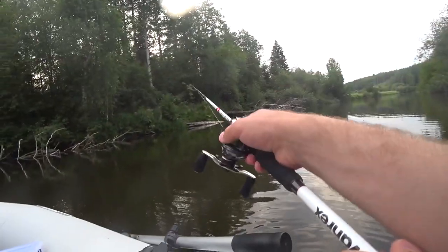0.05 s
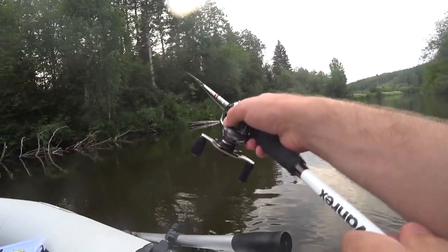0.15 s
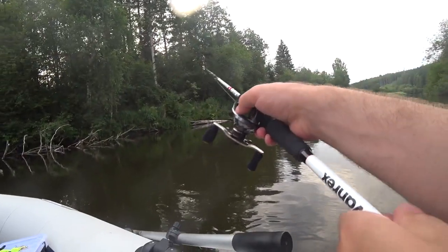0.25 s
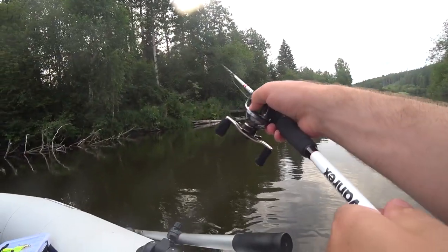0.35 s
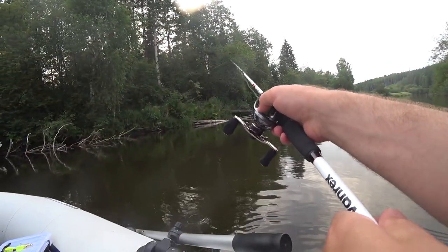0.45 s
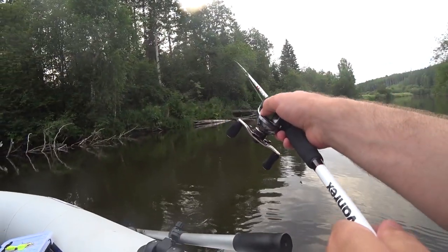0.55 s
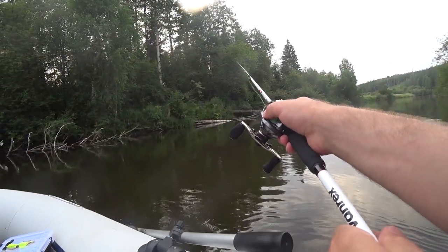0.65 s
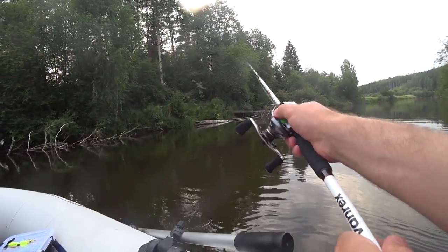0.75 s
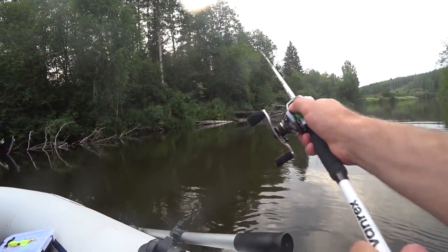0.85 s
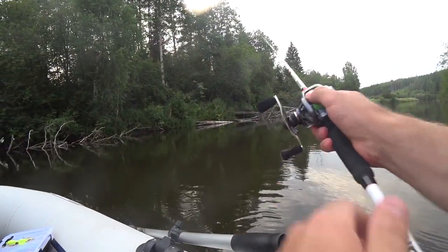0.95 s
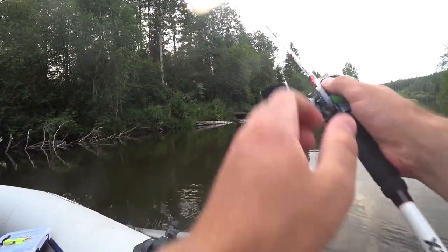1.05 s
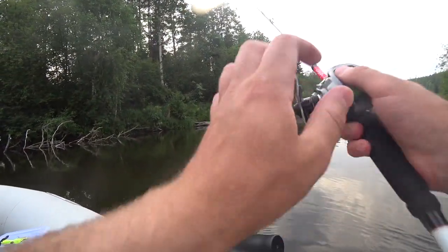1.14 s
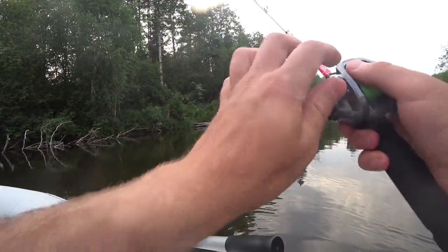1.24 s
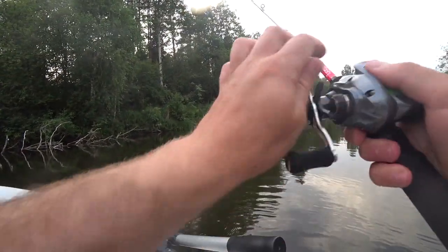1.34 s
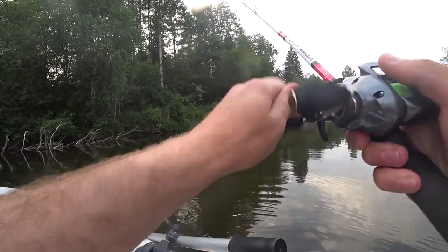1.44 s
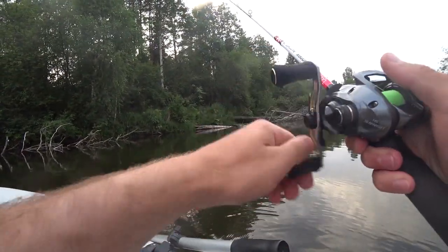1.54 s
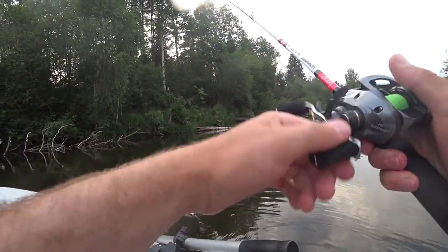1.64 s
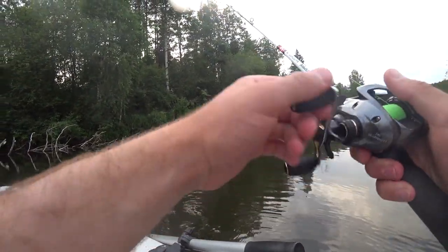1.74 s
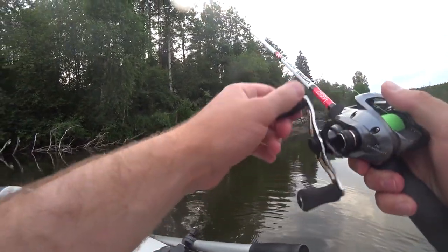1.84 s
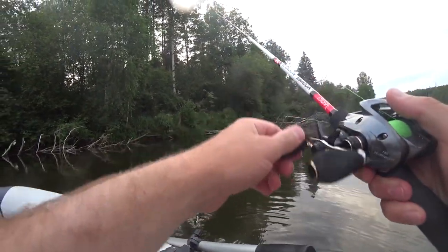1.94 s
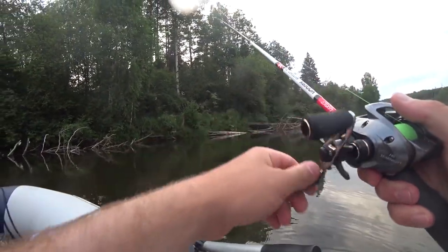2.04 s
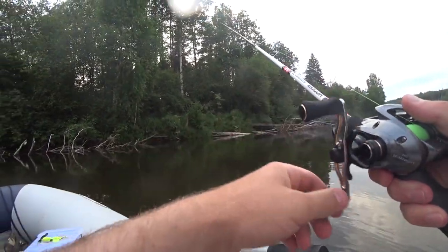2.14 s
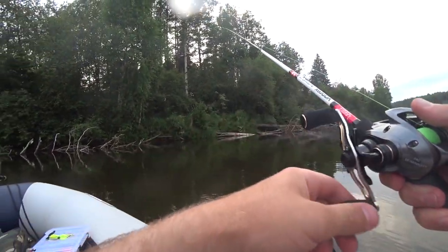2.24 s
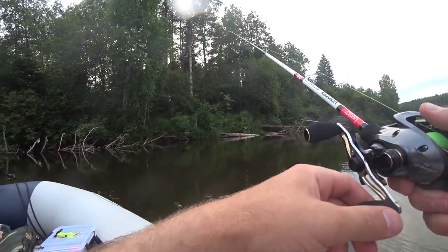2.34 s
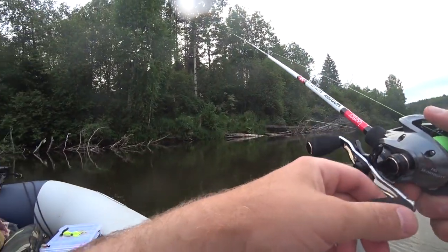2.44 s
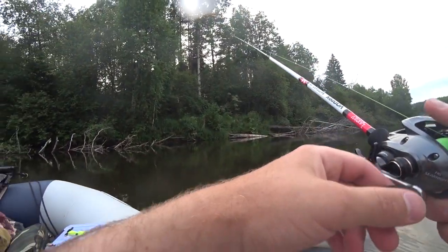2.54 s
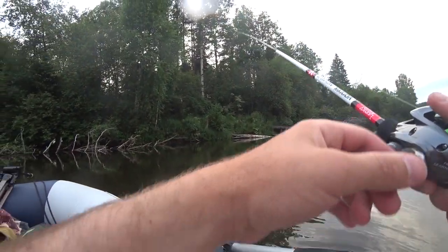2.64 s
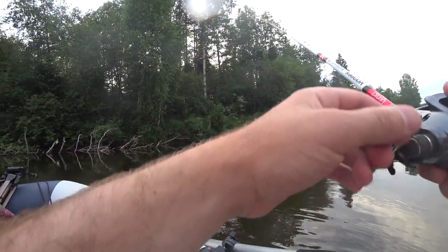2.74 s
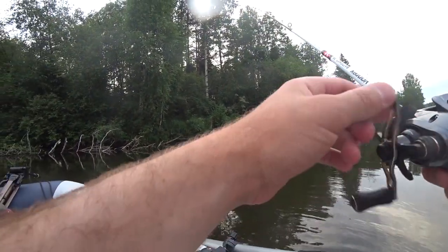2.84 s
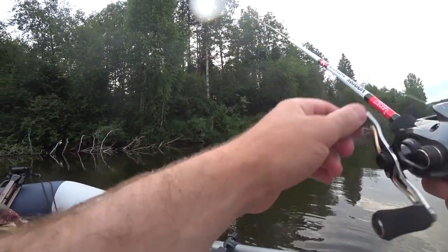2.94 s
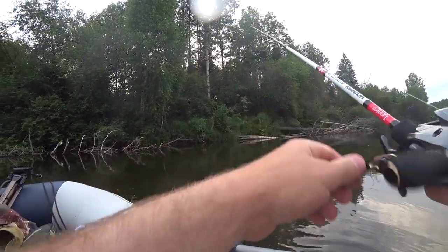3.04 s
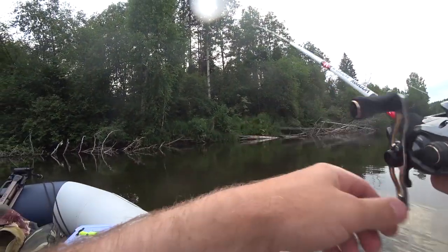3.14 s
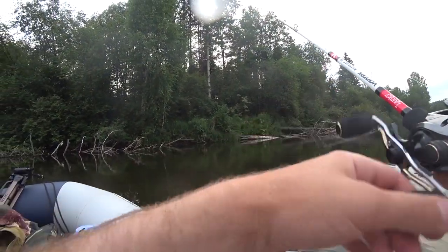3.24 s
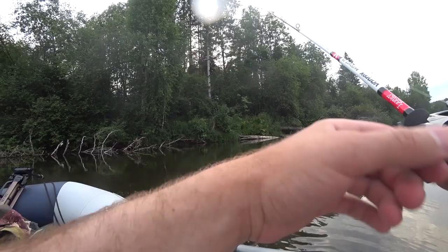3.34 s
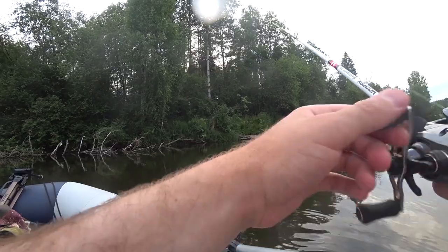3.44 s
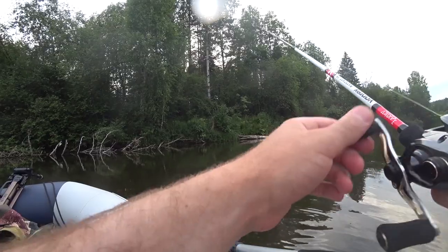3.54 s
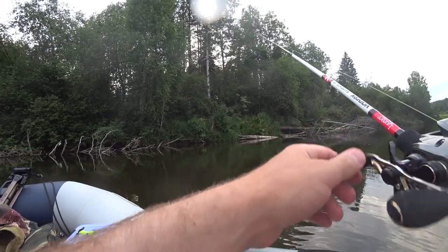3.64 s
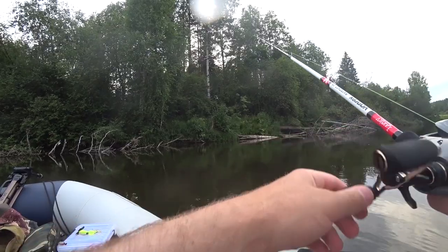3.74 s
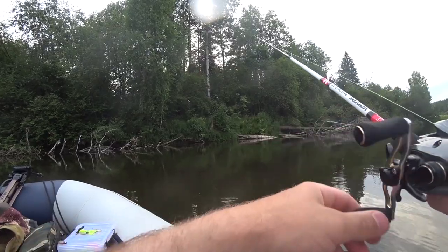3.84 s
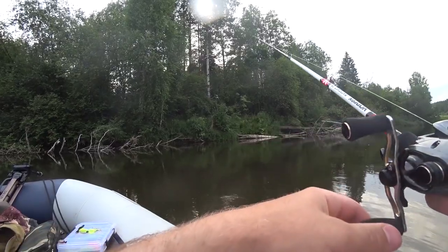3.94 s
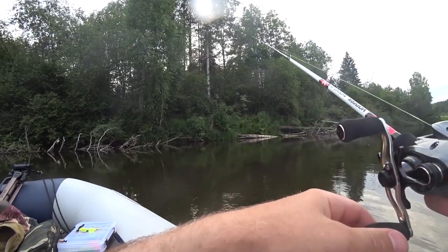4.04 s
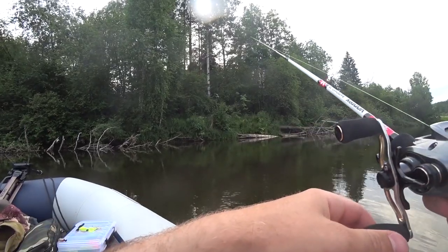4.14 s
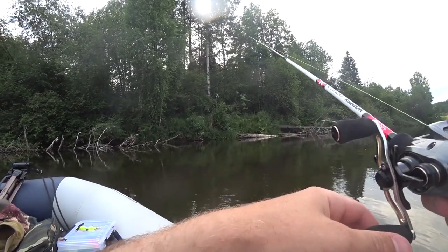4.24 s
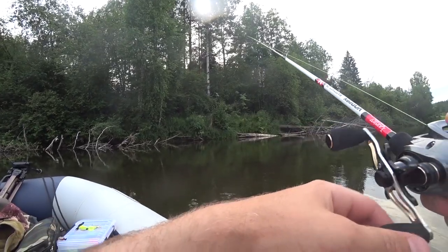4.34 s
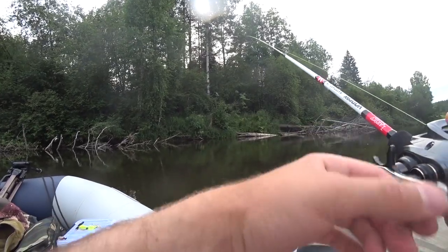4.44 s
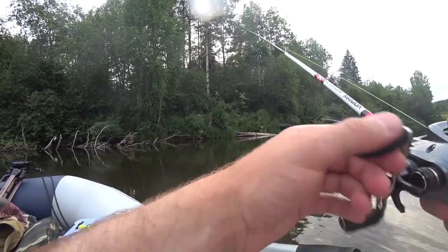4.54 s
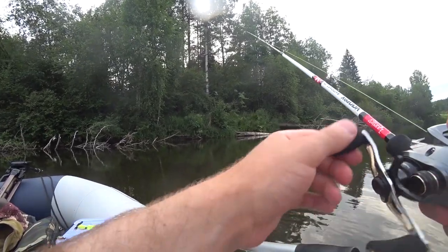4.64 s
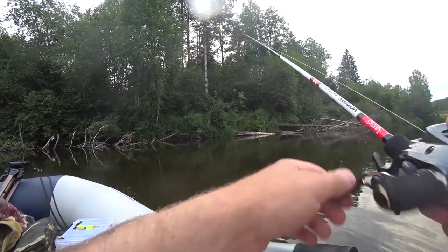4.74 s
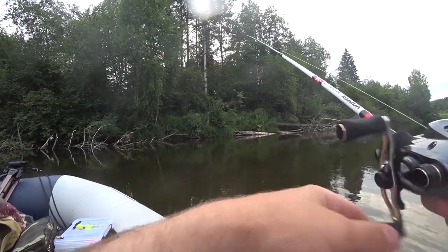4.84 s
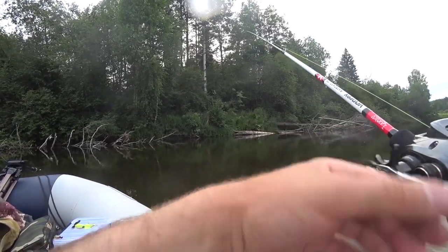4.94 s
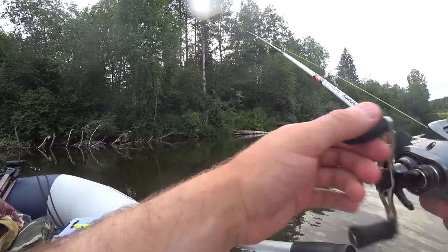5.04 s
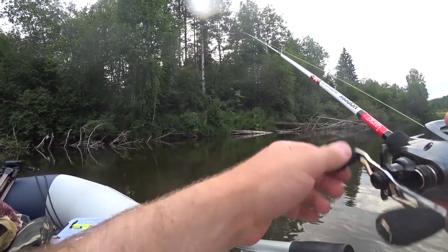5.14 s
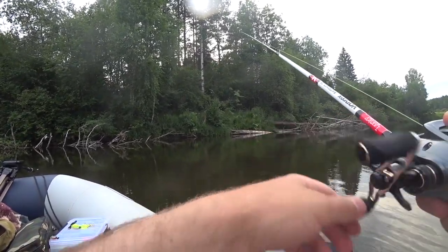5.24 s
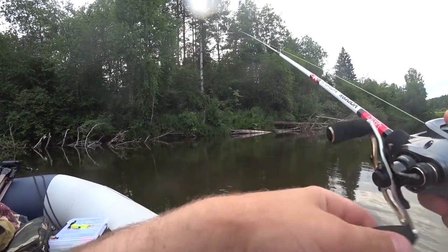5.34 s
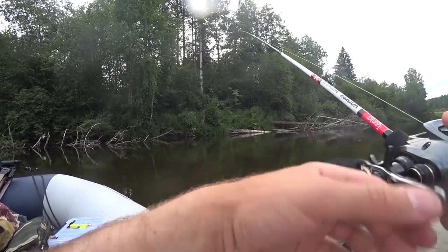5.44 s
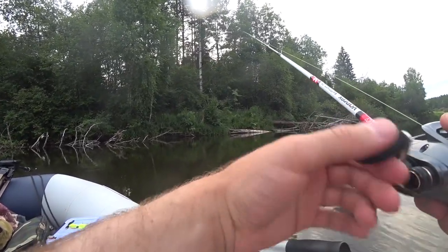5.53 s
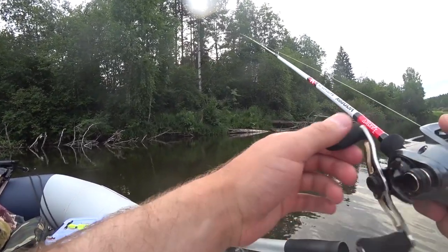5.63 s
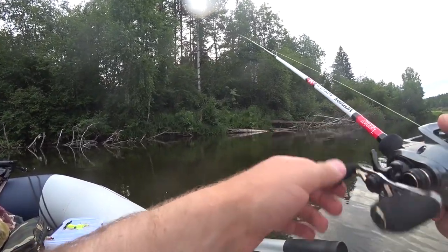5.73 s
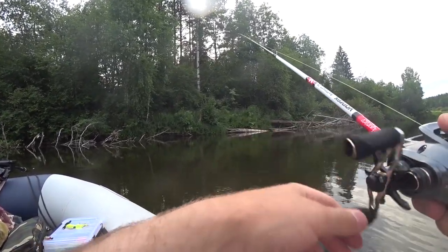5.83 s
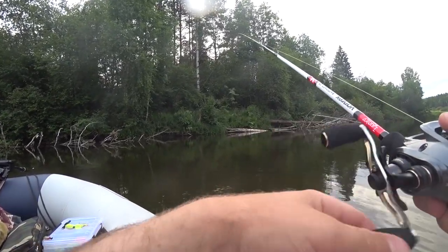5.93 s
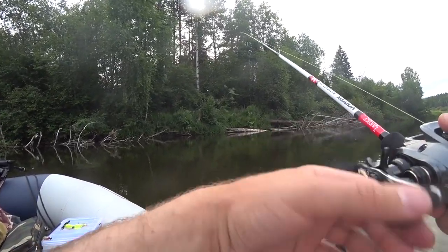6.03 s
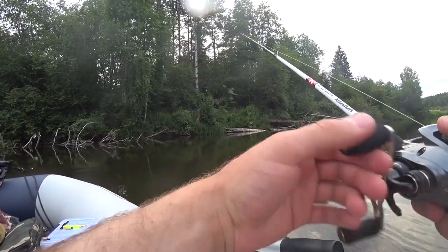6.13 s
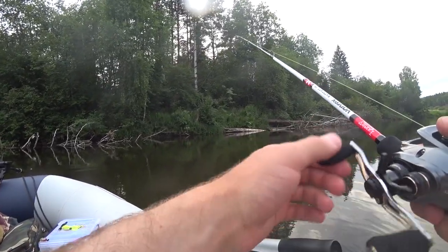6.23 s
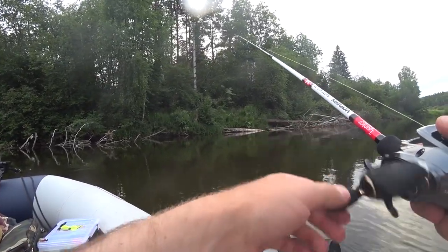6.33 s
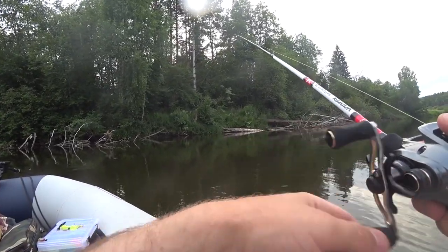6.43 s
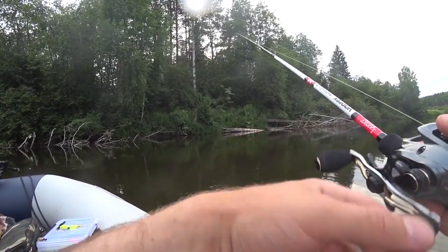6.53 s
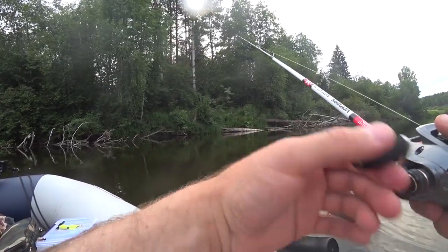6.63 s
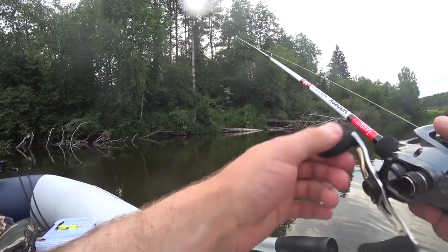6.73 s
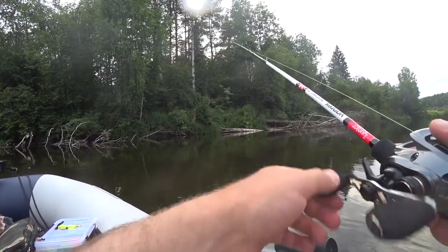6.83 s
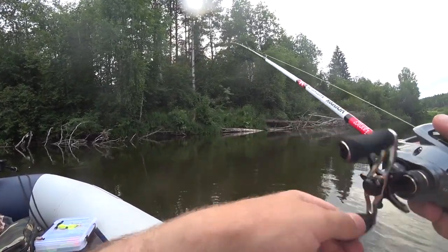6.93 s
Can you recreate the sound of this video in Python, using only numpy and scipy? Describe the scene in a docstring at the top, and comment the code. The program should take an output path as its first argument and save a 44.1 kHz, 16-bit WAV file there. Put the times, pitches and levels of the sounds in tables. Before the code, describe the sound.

Close-up casting reel whine slows quickly and cuts off, a sharp metallic snap follows, then gentle cranking rustles under chirping songbirds outdoors.

```python
"""A fishing cast from a boat on a quiet forest river, with open air and a thin whine throughout.
First the spool hums at multiples of its slowing speed, line hisses off as noise, loose coils slap, a thumb stops it.
Songbirds, made of gliding tones with an echo from the trees, join in and a low rumble of filtered noise fades in.
The clutch snaps in with clicks and knocks, then filtered noise winds the line softly back while the hand bumps the grip.
Later come an even trill of falling chips and last a see-saw song, high and low in turn."""
import sys
import numpy as np
from scipy import signal
from scipy.fft import rfft, irfft, next_fast_len
from scipy.io import wavfile

SR = 44100
rng = np.random.default_rng(int(sys.argv[2]) if len(sys.argv) > 2 else 0)


def store_wav(level_fs):
    """Save 16-bit WAV to argv[1]."""
    pcm = np.round(np.clip(np.atleast_2d(level_fs), -1, 1) * 32767)
    wavfile.write(sys.argv[1], SR, pcm.T.astype(np.int16))


N = 307818
T = np.arange(N) / SR  # time of every sample, in seconds

# Colour of the open air. Each row: frequency in Hz, level in dB.
AIR = [(15, -47), (25, -4), (104, -5.5), (1900, -26.5), (2450, -27.5), (3970, -25), (4630, -24.5),
       (4990, -28.5), (6780, -29.5), (10200, -32), (11000, -38), (14300, -92), (22000, -120)]
AIR_DB = -45.0
# The low rumble fades in and holds; its extra swell has rows: middle in seconds, length in seconds, level in dB.
RUMBLE_HZ, RUMBLE_WIDTH_HZ = 99.8, 19
RUMBLE_FROM_S, RUMBLE_FADE_S, RUMBLE_DB = 1.14, 1.1, -50.5
RUMBLE_SWELL = [(5.7, 1.5, -55)]
WHINE_HZ, WHINE_WANDER_HZ, WHINE_DB = 9945, 42, -64.5

# How fast the spool spins. Each row: time in seconds, turns per second (Hz).
SPEED = [(0.035, 314.1), (0.487, 179.7), (0.7, 111.1)]
# Strength of the spool's partials, before its body colours them; only multiples from 2 up are used.
# Each row: multiple of the spool speed, level in dB.
SPOOL_ORDERS = [(1, 0), (2, -8.5), (3, -2.5), (4, -7), (5, -7.5), (6, -9), (7, -8), (8, -12), (9, -11.5),
                (10, -14.5), (11, -9.5), (12, -9)]
# How the spool's body colours its partials. Each row: frequency in Hz, level in dB.
SPOOL_BODY = [(650, -19.5), (900, -3), (1500, 1.5), (2000, -1), (2450, 8.5), (2900, -2.5), (3500, 1.5),
              (4500, -6), (5400, -10), (6300, 0), (7200, -4), (11000, -16.5)]
# Colour of the line hissing off the spool. Each row: frequency in Hz, level in dB.
LINE_HISS = [(200, -7), (650, -12), (1300, -0.5), (2500, -3.5), (3200, -4), (4700, 0), (5500, -5.5),
             (7000, -5), (9000, 0.5), (11000, 0.5)]
# Levels at full speed; they fall as a power of the speed until the thumb stops the spool.
WHIR_DB, WHIR_POWER = -26.5, 3
HISS_DB, HISS_POWER = -25.5, 1.43
LINE_FLICK = 0.39  # once-a-turn flicks of the line, relative to its hiss
THUMB_S, THUMB_STOP_S = 0.77, 0.014
# The line runs off faster for a moment. Each row: middle in seconds, length in seconds, level in dB.
SURGES = [(.518, 0.045, -36), (.755, 0.033, -43)]

# Colour of a loose coil slapping the line guide. Each row: frequency in Hz, level in dB.
SLAP_BODY = [(300, -13.5), (2000, -27), (3300, 0.5), (4500, 2.5), (5400, -6), (6300, 1), (7600, -0.5),
             (8800, 5), (9600, 0.5), (10800, 2)]
SLAP_FROM_S, SLAP_TO_S, SLAP_ATTACK_S, SLAP_RELEASE_S = 0.261, 0.403, .012, 0.026
SLAP_PEAK_S, SLAP_DB, SLAP_SLOPE_DB_PER_S = 0.34, -20.5, 90
FRAME_HZ, FRAME_WIDTH_HZ = 4520, 950

# Clutch, pawl and spool clicks, before the tick boost and filters.
# Each row: start in seconds, metal tick in dB, housing knock in dB, knock pitch in Hz.
CLICKS = [(.3825, -13, -30, 3500), (.3853, -21, -19, 3600), (.552, -24, -21, 2500), (.789, -36, -27, 2500),
          (.816, -50, -33, 2250), (1.3590, -11, -12, 2900), (1.3711, -11, -30, 2500),
          (1.3731, -3, -20, 2300), (1.3743, -9, 1, 2180), (1.3788, -26, -16, 2400),
          (1.3826, -10, -24, 2300), (1.3834, -6, -14, 2400), (1.3892, -19, -22, 2200),
          (1.4057, -24, -45, 2100), (1.606, -28, -44, 2300), (4.932, -50, -32, 1100)]
# Colour of a metal tick. Each row: frequency in Hz, level in dB.
TICK_BODY = [(450, -24), (800, -6), (1500, -5), (3100, -2), (3700, -8), (4600, -2), (5400, -9), (6500, -3),
             (7300, -6), (8600, 1), (11000, -2)]
TICK_BOOST_DB, TICK_T60_S, KNOCK_RISE_S = 9.5, .005, .00045  # T60: time to die away by 60 dB
# After the clutch snaps in, the handle rocks in its play, weaker each time.
ROCK_S, ROCK_GAP_S = 1.394, .0168
ROCK_TICK_DB, ROCK_KNOCK_DB, ROCK_LOSS_DB, ROCK_HZ = -28, -15.5, 3.5, 2050
# Every click leaves a short dull shiver in the rod and housing, relative to its tick before the boost.
SHIVER_DB, SHIVER_T60_S, SHIVER_TOP_HZ = -17, 0.074, 4200
TOP_HZ = 11050  # treble limit

# Shapes of the birds' syllables: pitch from start to end, as a ratio to the note's pitch.
ARCH, SCOOP, LEVEL = (.94, 1, .85), (1.05, 1, 1.17), (.99, 1, 1.025)
UPSLUR, DOWNSLUR = (.94, 1, 1.1), (1.045, 1, .975)
WHIP = (.82, 1, .83, .76)
# Rising notes. Each row: start in seconds, length in seconds, pitch in Hz, level in dB.
UPSLURS = [(.84, 0.072, 5160, -51.5), (2.47, 0.094, 3270, -49.5), (3.505, .06, 4850, -50.5),
           (4.14, 0.044, 5180, -51.5)]
# Level whistles. Each row: start in seconds, length in seconds, pitch in Hz, level in dB.
WHISTLES = [(.9, .07, 4850, -52), (.93, .12, 3980, -53), (1.445, .17, 3983, -45),
            (1.722, 0.049, 5550, -46.5), (1.76, 0.092, 4545, -44.5), (2.1, 0.089, 3710, -48.5),
            (2.22, .065, 5800, -51.5), (2.34, 0.114, 3930, -50.5), (2.83, .04, 3910, -49),
            (3.17, .09, 3630, -53.5), (3.465, 0.11, 3670, -56.5), (4.22, 0.14, 3896, -51),
            (6.42, .08, 5800, -60)]
# Arched notes. Each row: start in seconds, length in seconds, pitch in Hz, level in dB.
ARCHES = [(1.03, .135, 4630, -46.5), (1.245, 0.12, 4600, -41), (1.655, 0.049, 3850, -42.5),
          (1.848, .055, 4080, -44), (2.203, 0.038, 3500, -43)]
# Quick notes that flick up and whip down. Each row: start in seconds, length in seconds, pitch in Hz, level in dB.
WHIPS = [(1.503, .082, 4780, -42.5), (2.027, .068, 4220, -43), (2.288, 0.069, 4750, -48.5)]
# Falling notes. Each row: start in seconds, length in seconds, pitch in Hz, level in dB.
DOWNSLURS = [(2.64, 0.073, 4690, -55), (2.98, .085, 4680, -49.5), (3.3, .07, 4170, -58),
             (3.4, .05, 4580, -56), (6.037, 0.051, 4220, -40.5), (6.875, .055, 4420, -50.5)]
# Scooped notes. Each row: start in seconds, length in seconds, pitch in Hz, level in dB.
SCOOPS = [(2.66, 0.091, 3130, -47.5), (2.84, .11, 3130, -48), (3.045, .05, 2220, -53.5)]
# Thin, buzzy calls of another bird. Each row: start in seconds, length in seconds, pitch in Hz, level in dB.
BUZZES = [(2.8, .09, 6900, -61), (4.58, 0.076, 6850, -49.5), (4.75, .16, 6730, -56.5),
          (5.07, .11, 6700, -57), (5.34, .09, 7050, -55.5)]
# An even trill of steep falling chips with a high pip between them.
# Each first note: start in seconds, length in seconds, pitch in Hz, level in dB.
CHIP, CHIP_SHAPE = (4.772, .07, 3870, -53.5), (1.19, 1, .8)
PIP = (4.872, .035, 5250, -53)
TRILL_GAP_S = .202
# A see-saw song, high and low in turn; its first notes have the same columns.
SEE, SAW = (5.885, .08, 4780, -49.5), (6.055, .065, 4000, -45.5)
SEESAW_GAP_S = .323
SONG_FLICKER_DB = 3
# Farther birds chirp at random, heard only through the trees; the level is before the echo.
FAR_DB, FAR_HZ, FAR_SPREAD, FAR_LENGTH_S = -57.5, 4200, 0.21, .07
FOREST_T60_S, FOREST_DB = .85, -4.5

# Wet line drawn through the guides. Each row: middle in seconds, length in seconds, level in dB.
SWISHES = [(.93, .06, -49.5), (1.68, 0.25, -52.5), (2.25, 0.13, -52), (2.39, 0.24, -52), (2.88, .1, -59),
           (4.43, .05, -54), (4.53, 0.083, -49), (4.64, 0.14, -51.5), (4.85, .3, -60), (6.85, .6, -59)]
# Spells of cranking. Each row: start in seconds, end in seconds, gear rustle in dB.
CRANKING = [(1.424, 3.4, -55.5), (4.375, 6.98, -54)]
CRANK_START_S, CRANK_STOP_S = 0.064, .6
# Colour of the gears. Each row: frequency in Hz, level in dB.
GEAR_BODY = [(300, -21.5), (700, -18.5), (1200, 5), (2300, 4), (3000, 3), (4500, 1), (7000, -3), (9000, -4),
             (11000, -28)]
# The hub rubbing as the handle comes round. Each row: middle in seconds, length in seconds, level in dB.
RUBS = [(1.687, 0.2, -51.5), (2.229, 0.12, -48.5), (2.84, 0.13, -56), (3.26, 0.15, -51.5),
        (4.55, 0.13, -56), (4.953, 0.21, -51.5)]
# The hand shifting on the grip. Each row: middle in seconds, length in seconds, level in dB.
SHIFTS = [(1.452, 0.027, -36.5), (1.53, 0.047, -47), (1.68, .17, -44.5), (2.04, 0.33, -49),
          (2.23, 0.14, -49.5)]
# Dull colour of the hand on the hollow grip. Each row: frequency in Hz, level in dB.
HAND_BODY = [(90, -22), (130, -3), (190, 1), (260, -3), (390, 1), (540, -12), (1200, -24), (3000, -45)]
GRIP_DB = -2  # dull noise of the cranking hand, relative to the gears
# Soft bumps of the palm on the grip. Each row: start in seconds, level in dB, pitch in Hz.
BUMPS = [(1.445, -36, 195), (1.52, -28.5, 182), (1.56, -34, 130), (1.665, -37, 201), (1.883, -34.5, 182),
         (2.069, -40, 180)]


def undb(db):
    """Turn decibels into a gain."""
    return 10 ** (np.asarray(db) / 20)


def unit(x):
    """Scale to an average (rms) strength of 1."""
    return x / np.sqrt(np.mean(x ** 2))


def curve(rows):
    """Draw straight lines between (seconds, value) rows, at every sample."""
    return np.interp(T, *np.transpose(rows))


def colour(x, points):
    """Filter to the given (Hz, dB) spectrum, without sounding before its input."""
    hz, db = np.transpose(points)
    size = next_fast_len(N + SR // 10) // 2 * 2
    freq = np.maximum(np.fft.rfftfreq(size, 1 / SR), 1)
    gain = undb(np.interp(np.log(freq), np.log(hz), db))
    # folding the cepstrum forward gives the minimum-phase filter
    cepstrum = irfft(np.log(gain))
    cepstrum[1:size // 2] *= 2
    cepstrum[size // 2 + 1:] = 0
    response = np.exp(rfft(cepstrum))
    return irfft(rfft(x, size) * response)[..., :N]


def resonate(x, hz, width_hz):
    """Ring one resonance of the given pitch and width."""
    return signal.lfilter(*signal.iirpeak(hz, hz / width_hz, fs=SR), x)


def band(hz, width_hz):
    """Noise in one resonance, rms 1."""
    return unit(resonate(rng.standard_normal(N), hz, width_hz))


def butter(x, order, hz, kind="low"):
    """Keep the lows, or a band, with a smooth filter."""
    return signal.sosfilt(signal.butter(order, hz, kind, fs=SR, output="sos"), x)


def walk(rate):
    """Slow chance with a spread near 1, given new random points per second."""
    return np.interp(T * rate, np.arange(N // 10), rng.standard_normal(N // 10))


def place(x, left_db, spread):
    """Two channels: a level difference, and brief reflections from hands and boat that differ between them."""
    scatter = rng.standard_normal(SR // 200)
    side = spread * signal.fftconvolve(x, scatter / np.linalg.norm(scatter))[:N]
    return np.array([(x + side) * undb(left_db / 2), (x - side) * undb(-left_db / 2)])


def add(track, s, sound):
    """Mix a short sound in at time s."""
    start = max(int(s * SR), 0)
    track[start:start + len(sound)] += sound[:max(N - start, 0)]


def swells(rows):
    """Smooth rises and falls, each with its own time, length and level."""
    return sum(undb(db) * np.exp(-(2 * (T - s) / length) ** 2) for s, length, db in rows)


def gate(start, end, attack, release):
    """Rise from the start, hold until the end, then fall."""
    return np.clip((T - start) / attack, 0, 1) * np.clip(1 - (T - end) / release, 0, 1)


def background():
    """Open air over the river and a low rumble are filtered noise; the thin whine is a slightly wandering tone."""
    mid, side = colour(rng.standard_normal((2, N)), AIR)
    # the two channels differ by more at some pitches than at others
    side = colour(side, [(50, -20.0), (125, -13.5), (250, -5.5), (600, 1.5), (2000, 3.0), (5000, -6.5),
                         (10000, -0.5)])
    air = unit(np.array([mid + side, mid - side])) * undb(AIR_DB + 0.13 * walk(2.88))
    rumble = butter(band(RUMBLE_HZ, RUMBLE_WIDTH_HZ), 2, 220)
    fade = np.clip((T - RUMBLE_FROM_S) / RUMBLE_FADE_S, 0, 1)
    strength = undb(RUMBLE_DB) * fade + swells(RUMBLE_SWELL)
    whine_hz = WHINE_HZ + WHINE_WANDER_HZ * walk(300)
    whine = unit(np.sin(2 * np.pi * np.cumsum(whine_hz) / SR))
    return air + rumble * strength + whine * undb(WHINE_DB)


def spool(count=36):
    """The unbalanced spool hums and shakes the frame at multiples of its speed; the line hisses off it."""
    (s0, hz0), (s1, hz1) = SPEED[0], SPEED[-1]
    slowing = (hz1 - hz0) / (s1 - s0)
    hz = curve(SPEED) + np.clip(T - s1, 0, .1) * slowing  # the brake keeps slowing it
    speed = hz / hz0
    running = np.clip(1 - (T - THUMB_S) / THUMB_STOP_S, 0, 1)
    turns = np.cumsum(hz * (1 + 0.0037 * walk(150))) / SR
    hum = np.sin(2 * np.pi * turns) * speed
    # each partial swells and flickers as the line wanders across the spool
    bearings = np.zeros(N)
    for k in range(2, count):
        db = dict(SPOOL_ORDERS).get(k, -10) + (2.5 * walk(22) + 1.8 * walk(170))[:SR]
        add(bearings, 0, undb(db) * np.sin(2 * np.pi * (k * turns[:SR] + rng.random())))
    whir = undb(-4.0) * hum + undb(-0.5) * colour(bearings, SPOOL_BODY)
    whir = whir * undb(WHIR_DB) * speed ** WHIR_POWER
    flutter = 1 + .4 * np.cos(2 * np.pi * turns)
    flicks = np.diff(np.floor(turns), prepend=0) * np.sqrt(SR / hz)
    rush = (rng.standard_normal(N) * flutter + LINE_FLICK * flicks) * undb(0.9 * walk(820))
    hiss = unit(colour(rush, LINE_HISS)) * (undb(HISS_DB) * speed ** HISS_POWER + swells(SURGES))
    rasp = unit(undb(1.1 * walk(400)))  # the line drags unevenly from turn to turn
    return place((whir * rasp + hiss) * running + slap(turns), left_db=-0.8, spread=0.21)


def slap(turns):
    """A loose coil brushes the line guide twice a turn and rings the frame once a turn."""
    strikes = np.diff(np.floor(turns), prepend=0)
    brushes = strikes + 0.7 * np.diff(np.floor(turns + .5), prepend=0)
    contact = signal.lfilter([1], [1, -np.exp(-1 / (.0013 * SR))], brushes)  # each touch fades in 1.3 ms
    scrape = colour(1.15 * unit(brushes) + unit(rng.standard_normal(N) * contact), SLAP_BODY)
    frame = resonate(resonate(strikes, FRAME_HZ, FRAME_WIDTH_HZ), FRAME_HZ, FRAME_WIDTH_HZ)
    force = undb(SLAP_DB - SLAP_SLOPE_DB_PER_S * np.abs(T - SLAP_PEAK_S) + walk(197))
    loose = gate(SLAP_FROM_S, SLAP_TO_S, SLAP_ATTACK_S, SLAP_RELEASE_S)
    return (undb(-1.0) * unit(scrape) + undb(-15.0) * unit(frame)) * force * loose


def clicks():
    """Steel parts snap together; each contact also knocks the damped housing for a few cycles."""
    ticks, knocks, shivers = np.zeros(N), np.zeros(N), np.zeros(N)
    t = T[:SR // 20]
    rocking = [(ROCK_S + k * ROCK_GAP_S, ROCK_TICK_DB - 2 * k * ROCK_LOSS_DB,
                ROCK_KNOCK_DB - k * ROCK_LOSS_DB, ROCK_HZ) for k in range(3)]
    # a sharp snap with a weaker, longer tail
    snap = undb(-60 * t / TICK_T60_S) + undb(-27 - 60 * t / .04)
    swell = (t / KNOCK_RISE_S) ** 2 * np.exp(-t / KNOCK_RISE_S)
    for s, tick_db, knock_db, hz in CLICKS + rocking:
        contact = rng.standard_normal(len(t)) * snap
        add(ticks, s, undb(tick_db + TICK_BOOST_DB) * 2 * contact / np.linalg.norm(contact))
        add(shivers, s, undb(tick_db + SHIVER_DB - 60 * t / SHIVER_T60_S) * rng.standard_normal(len(t)))
        add(knocks, s, undb(knock_db) * swell * np.sin(2 * np.pi * hz * t))
    ticks = butter(colour(ticks, TICK_BODY), 6, TOP_HZ)
    knocks = knocks + butter(shivers, 2, [350, SHIVER_TOP_HZ], "band")
    return place(ticks, left_db=-2.5, spread=.27) + place(knocks, left_db=-4, spread=.2)


def sing(notes, shape, waver=0.0099):
    """Each note is one wavering tone that glides through the shape of its syllable."""
    out = np.zeros(N)
    glide = np.polyfit(np.linspace(0, 1, len(shape)), shape, len(shape) - 1)
    wobble = 1 + waver * walk(500)
    flicker = unit(undb(SONG_FLICKER_DB * walk(130)))
    for s, length, pitch_hz, db in notes:
        u = np.linspace(0, 1, int(length * SR))  # progress through the note
        hz = pitch_hz * np.polyval(glide, u) * np.roll(wobble, -int(s * SR))[:len(u)]
        loudness = undb(db) * np.sqrt(2 * np.abs(np.sin(np.pi * u)))
        add(out, s, loudness * np.sin(2 * np.pi * np.cumsum(hz) / SR))
    return out * flicker


def repeat(note, gap_s, count):
    """The same note again and again at an even pace."""
    return [(note[0] + k * gap_s, *note[1:]) for k in range(count)]


def far_chirps(count=48):
    """Short notes at chance times and pitches."""
    return [(u * N / SR, FAR_LENGTH_S, FAR_HZ * (1 + FAR_SPREAD * (2 * v - 1)), FAR_DB)
            for u, v in rng.random((count, 2))]


def birds():
    """Song from the bank, with a late, thin echo from the trunks made of fading noise."""
    warble = (sing(UPSLURS, UPSLUR) + sing(WHISTLES, LEVEL) + sing(ARCHES, ARCH)
              + sing(WHIPS, WHIP, waver=0.017) + sing(DOWNSLURS, DOWNSLUR) + sing(SCOOPS, SCOOP))
    buzz = sing(BUZZES, LEVEL, waver=0.0326)
    chips = sing(repeat(CHIP, TRILL_GAP_S, count=5), CHIP_SHAPE)
    pips = sing(repeat(PIP, TRILL_GAP_S, count=3), DOWNSLUR)
    high = sing(repeat(SEE, SEESAW_GAP_S, count=3), DOWNSLUR)
    low = sing(repeat(SAW, SEESAW_GAP_S, count=3), LEVEL)
    song = warble + buzz + chips + pips + high + low
    t = T[:SR]
    trunks = rng.standard_normal(len(t)) * undb(-60 * t / FOREST_T60_S) * (1 - np.exp(-t / .02))
    echo = signal.fftconvolve(song + sing(far_chirps(), ARCH), trunks / np.linalg.norm(trunks))[:N]
    return place(song, left_db=0.5, spread=0.46) + undb(FOREST_DB) * place(echo, left_db=1.5, spread=0.31)


def winding():
    """Line swishes, gears rustle in fine grains, the hub rubs, and the hand shifts on the hollow grip."""
    line = unit(band(4900, 1200) + band(6000, 2200)) * undb(2 * walk(300)) * swells(SWISHES)
    effort = sum(undb(db) * gate(start, end, CRANK_START_S, CRANK_STOP_S) for start, end, db in CRANKING)
    grains = rng.standard_normal(N) * undb(2.1 * walk(1500) + 3.5 * walk(30))
    gears = unit(colour(grains, GEAR_BODY)) * effort
    hub = unit(band(1220, 770) + band(2020, 1100)) * undb(2 * walk(150)) * swells(RUBS)
    hand = unit(colour(rng.standard_normal(N) * undb(2 * walk(60)), HAND_BODY))
    hand = hand * (swells(SHIFTS) + undb(GRIP_DB) * effort)
    return place(gears + hub + line, left_db=-2.5, spread=0.31) + place(hand, left_db=-0.5, spread=0.18)


def bumps():
    """The palm lands on the grip and the rod answers with a few low cycles."""
    out, t = np.zeros(N), T[:SR // 8]
    fade = (1 - np.exp(-t / 0.0034)) * undb(-60 * t / 0.1)
    for s, db, hz in BUMPS:
        add(out, s, undb(db) * np.sin(2 * np.pi * hz * t) * fade)
    return place(out, left_db=0, spread=0.18)


def scene():
    """Reel close by, birds and river around."""
    return background() + spool() + clicks() + birds() + winding() + bumps()


def record(dry):
    """Clip at full scale, then cut the treble steeply."""
    return signal.sosfilt(signal.ellip(10, .2, 70, TOP_HZ, fs=SR, output="sos"), np.clip(dry, -1, 1))


dry = scene()
out = record(dry)
store_wav(out)
```